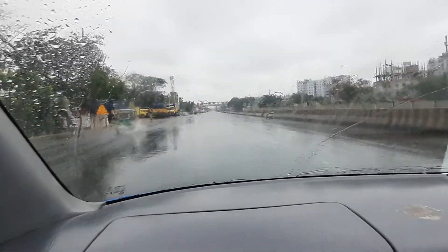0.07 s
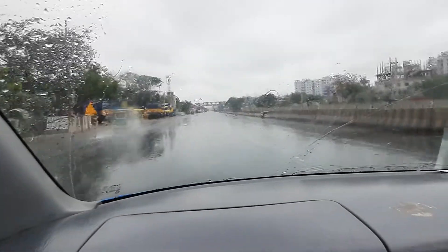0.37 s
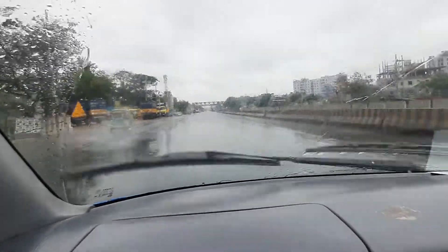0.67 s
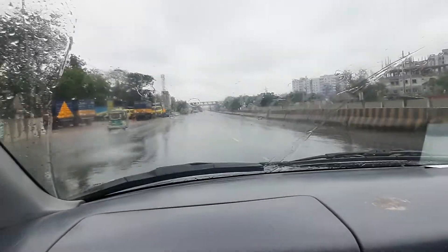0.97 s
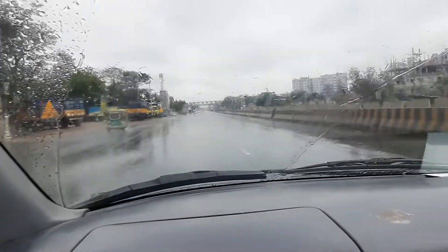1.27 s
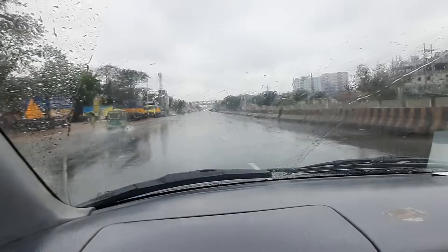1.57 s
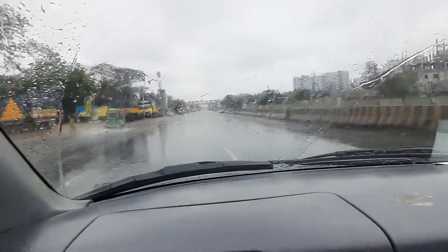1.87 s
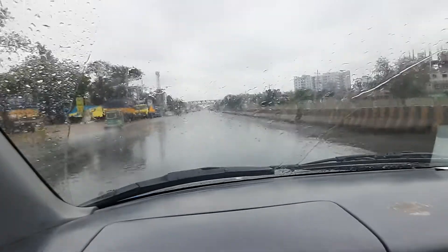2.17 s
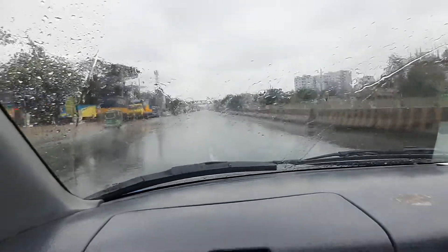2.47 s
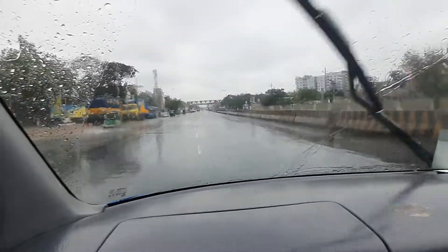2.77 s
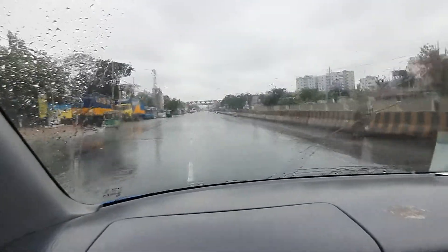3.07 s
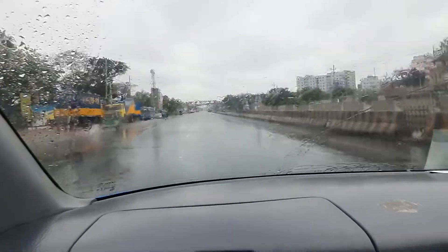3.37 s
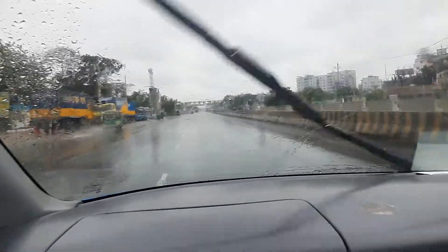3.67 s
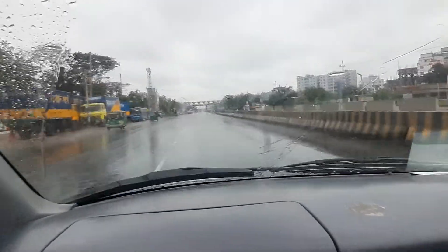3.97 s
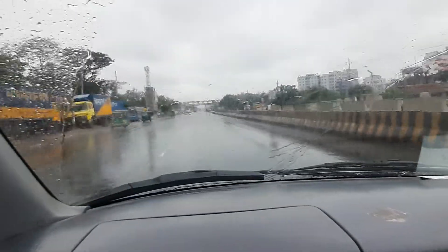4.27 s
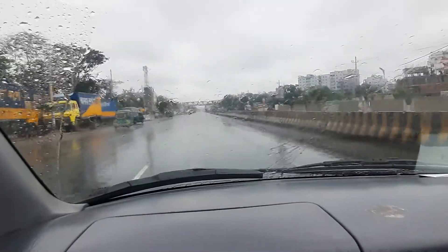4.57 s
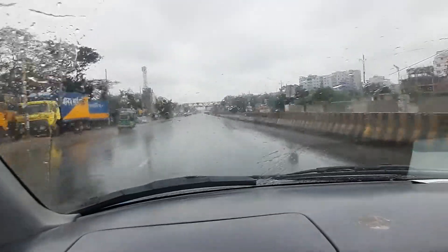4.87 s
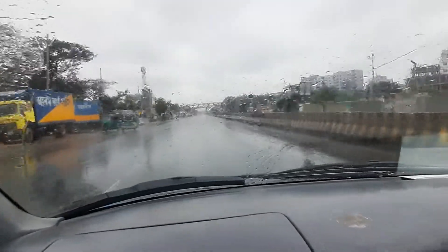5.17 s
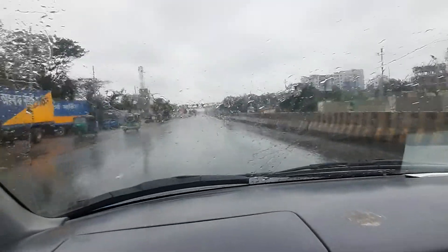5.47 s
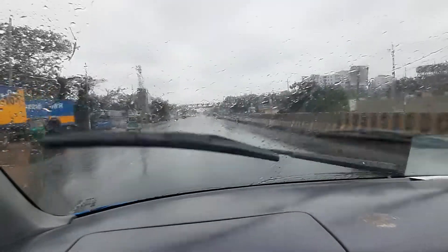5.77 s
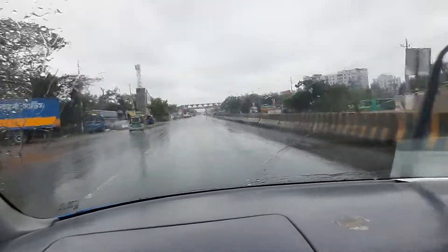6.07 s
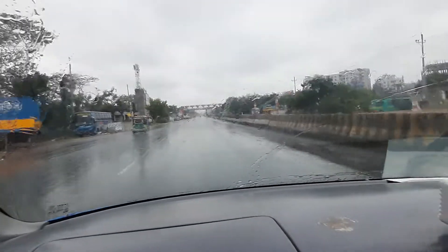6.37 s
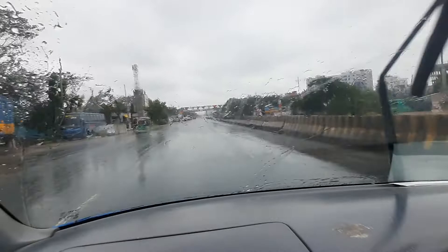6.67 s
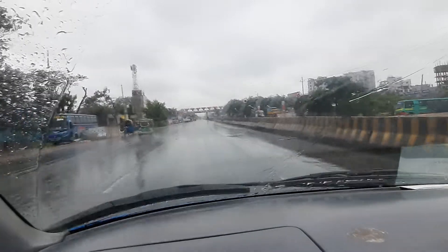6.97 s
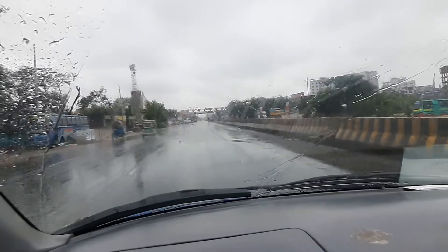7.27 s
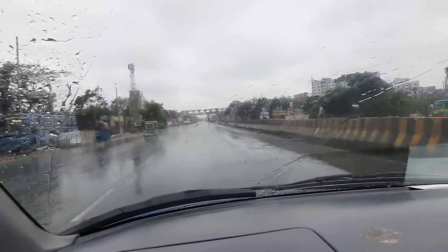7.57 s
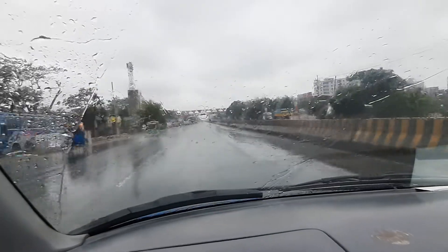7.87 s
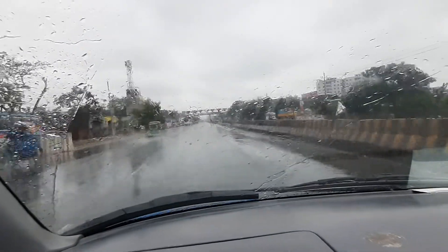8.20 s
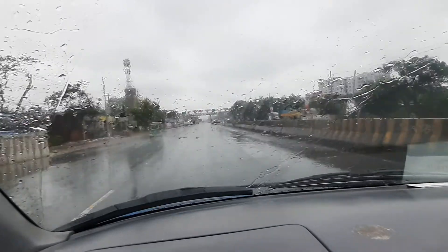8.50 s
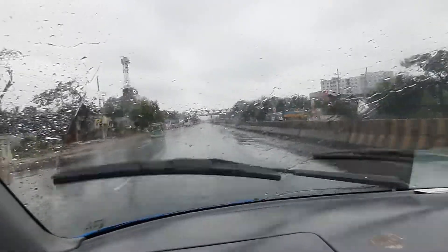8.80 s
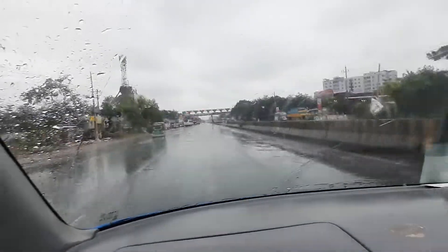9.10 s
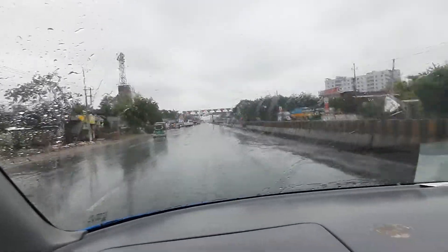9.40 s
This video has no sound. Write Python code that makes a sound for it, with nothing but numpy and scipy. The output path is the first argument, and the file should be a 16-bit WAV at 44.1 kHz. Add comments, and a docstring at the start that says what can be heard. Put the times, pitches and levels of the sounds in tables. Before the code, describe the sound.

A small car drives through rain, heard from inside the cabin. A deep, throbbing tyre boom and wet road roar run throughout, with an engine hum that falls in pitch as the car shifts up near the start. Drops tap sharply on the glass over short splashes and dull thuds. The wipers sweep quietly at intervals, a blade groaning briefly just past the middle and again near the end.

```python
"""Tyres boom on a rain-soaked highway, heard inside a small car that is gathering speed.
The boom beats against the engine's drone, which drops as the car shifts up after a second and a half.
The wet road roars, hisses and sloshes, and rough stretches of tarmac set the cabin drumming.
Drops and spray tick on the glass, and now and then a panel gives a dull knock.
The wipers rub and click about every three seconds, and twice a blade groans."""
import sys
import numpy as np
from scipy import signal
from scipy.fft import rfft, irfft, next_fast_len
from scipy.io import wavfile
from scipy.ndimage import uniform_filter1d

SR = 44100
rng = np.random.default_rng(int(sys.argv[2]) if len(sys.argv) > 2 else 0)


def unload_wav(signal):
    """Save mono or channel-first audio to the path in sys.argv[1] as 16-bit WAV at rate SR, clipped to [-1, 1]."""
    wavfile.write(
        sys.argv[1],
        SR,
        np.round(np.clip(np.atleast_2d(signal).T, -1, 1) * 32767).astype(np.int16),
    )


N = 420713
TIME = np.arange(N) / SR   # seconds
FFT_SIZE = 2 * next_fast_len(N // 2 + 1, True)
BIN_HZ = np.maximum(np.arange(FFT_SIZE // 2 + 1) * SR / FFT_SIZE, 1)
SHIFT_START_S = 1.35   # when the gear change begins
PING_HZ = 7250   # the pitch around which the drops ping


def from_db(db):
    """Turn decibels into a number to multiply a sound by."""
    return 10 ** (np.asarray(db) / 20)


def rms_one(x):
    """Scale a signal so that its average strength (rms) is 1."""
    return x / np.sqrt(np.mean(x ** 2) + 1e-20)


def in_time(points):
    """Join the points of a (time, value) table with straight lines, giving a value for every sample."""
    return np.interp(TIME, *np.transpose(points))


def over_hz(points, outside=None):
    """Join the points of a (frequency, value) table; past its ends, hold them or use `outside`."""
    hz, value = np.transpose(points)
    return np.interp(np.log(BIN_HZ), np.log(hz), value, outside, outside)


def ramp(start, length):
    """A smooth step from 0 to 1."""
    return .5 - .5 * np.cos(np.pi * np.clip((TIME - start) / length, 0, 1))


def drift(rate):
    """A random wobble of typical size 1 that turns about `rate` times a second."""
    steps = rng.standard_normal(N // 8)
    return rms_one(np.interp(TIME * np.pi * rate, np.arange(len(steps)), steps))


def pan(db):
    """Left and right gains that make the left side `db` decibels louder."""
    return from_db(np.array([[.5], [-.5]]) * db)


def tone(hz, waver_db, waver_rate, jitter_hz):
    """A tone that follows a pitch curve and wavers a little in strength and pitch."""
    cycles = np.cumsum(hz + jitter_hz * drift(waver_rate)) / SR
    return rms_one(np.sin(2 * np.pi * cycles) * from_db(waver_db * drift(waver_rate)))


def split(x, hz):
    """The parts of a sound below and above a frequency."""
    low = signal.sosfiltfilt(signal.butter(4, hz, fs=SR, output="sos"), x)
    return low, x - low


def strikes(times, db):
    """A spike of energy at each of the given moments."""
    return np.bincount(np.clip(times * SR, 0, N - 1).astype(int), from_db(db) ** 2, N)


def dying(energy, t60):
    """Let energy die away; t60 is the time in seconds it takes to fade by 60 dB."""
    return signal.lfilter([1], [1, -from_db(-60 / (t60 * SR)) ** 2], energy + 1e-18)


# how alike the two ears hear the cabin: (frequency [Hz], likeness [1 = same, 0 = unrelated])
EAR_LIKENESS = [(60, .998), (150, .998), (220, 0.83), (380, 0.39), (680, 0.82), (1000, 0.14), (1400, -0.19),
                (3000, 0), (15000, 0)]
# which side is louder: (frequency [Hz], left over right [dB])
EAR_BALANCE = [(60, 3.5), (120, 2), (170, 2), (270, 5.5), (380, 0), (700, 0.5), (950, 0.5), (1350, -3),
               (2000, -3.5), (2800, -0.5), (8800, 0.5), (13000, -2)]
def cabin_noise(spectrum):
    """Stereo noise of strength 1, coloured by a spectrum: the bass is alike at both ears, the treble not."""
    shared, opposite = rfft(rng.standard_normal((2, FFT_SIZE)))
    alike = over_hz(EAR_LIKENESS)
    ears = np.sqrt(1 + alike) * shared + np.sqrt(1 - alike) * opposite * [[1], [-1]]
    colour = from_db(over_hz(spectrum, outside=-np.inf)) * pan(over_hz(EAR_BALANCE))
    return rms_one(irfft(ears * colour, FFT_SIZE)[:, :N])


# how fast the wheels spin: (time [s], speed [turns per s])
WHEEL_SPEED = [(0, 7.57), (2.1, 7.55), (5, 7.98), (9.54, 8.53)]
# how loud the tyres boom: (time [s], level [dB])
TYRE_BOOM_LEVEL = [(0, -27), (.45, -19.5), (1.5, -22.5), (2.15, -19.5), (2.9, -23.5), (3.6, -18),
                   (4.7, -22.5), (5.3, -20.5), (5.9, -17), (7.1, -22), (8, -21.5), (8.5, -24), (9.54, -21)]
def tyre_boom(pushes_per_turn=7, throb_db=-2.5):
    """Uneven tyres shake the cabin's air near its lowest natural note, throbbing once per wheel turn."""
    speed = in_time(WHEEL_SPEED)
    throb = np.sin(2 * np.pi * np.cumsum(speed) / SR)
    boom = tone(speed * pushes_per_turn, waver_db=1.6, waver_rate=3, jitter_hz=.2)
    return from_db(in_time(TYRE_BOOM_LEVEL) + throb_db * throb) * boom * pan(1.5)


def engine_load():
    """How hard the engine pulls: 1 in low gear, falling to 0 through the gear change."""
    return 1 - ramp(SHIFT_START_S, length=.65)


# tones of the engine's whine: (pitch [times the firing rate], relative level [dB])
WHINE_TONES = [(2.4, 2), (3.6, 4.5), (4.75, -3), (6.5, -2), (8.25, .8), (10.05, -9), (16.5, -17)]
def engine(start_hz=82.8, climb_hz_per_s=.62, shift_drop_hz=22):
    """The firing cylinders drone and the alternator hums; a whine sinks and fades at the gear change."""
    load = engine_load()
    firing_hz = start_hz + climb_hz_per_s * TIME - shift_drop_hz * (1 - load)
    drone_db = -33 * load - 27 * (1 - load)   # louder in high gear, near the cabin's lowest natural note
    drone = from_db(drone_db) * tone(firing_hz, waver_db=1.2, waver_rate=3, jitter_hz=.1)
    octave = from_db(-35) * tone(2 * firing_hz, waver_db=3.5, waver_rate=3, jitter_hz=.13)
    hum_db = -41.5 - 4 * load   # softer in low gear, where it lies above the cabin's resonance
    alternator = from_db(hum_db) * tone(4.125 * firing_hz, waver_db=2.5, waver_rate=6.8, jitter_hz=.87)
    whine = sum(from_db(db) * tone(multiple * firing_hz, waver_db=2.2, waver_rate=26, jitter_hz=3.8)
                for multiple, db in WHINE_TONES)
    return (drone + octave + alternator + from_db(-41) * load ** 2 * whine) * pan(1.8)


# how loud the gearbox hums: (time [s], level [dB])
GEARBOX_LEVEL = [(0, -36), (2.2, -29), (3.6, -51), (4.4, -27.5), (5.4, -29), (6.2, -28), (6.75, -33),
                 (7.2, -24.5), (8.7, -27.5), (9.54, -36)]
def gearbox_hum(shaft_turns_per_wheel_turn=6.74, throb_hz=4, throb_depth=.6, crest_s=7.225):
    """A spinning shaft hums at two and three times its turning rate; the upper tone throbs evenly."""
    shaft_hz = in_time(WHEEL_SPEED) * shaft_turns_per_wheel_turn
    upper = tone(3 * shaft_hz, waver_db=1.2, waver_rate=7, jitter_hz=.5)
    lower = from_db(-8) * tone(2 * shaft_hz, waver_db=2.5, waver_rate=5, jitter_hz=.8)
    throb = rms_one(1 + throb_depth * np.cos(2 * np.pi * throb_hz * (TIME - crest_s)))
    return from_db(in_time(GEARBOX_LEVEL)) * (throb * upper + lower) * pan(2.8)


# the deep boom of the car's body: (frequency [Hz], relative level [dB])
BODY_SPECTRUM = [(15, -22), (30, -18), (40, -19), (48, -3), (54, 0), (68, -3), (80, -9), (110, -22),
                 (200, -50)]
# the rumble of the road: (frequency [Hz], relative level [dB])
RUMBLE_SPECTRUM = [(20, -43), (37, -13), (47, 0), (70, -12.5), (90, -0.5), (113, 2.5), (142, -10),
                   (170, -8), (205, -8.5), (240, -15), (400, -64)]
def road_rumble(rough_boost_db=3):
    """Tarmac shakes the car's body, and shakes it harder on the rough stretches."""
    rough_db = rough_boost_db * sum(on_stretch(start, length) for start, length, _ in ROUGH_TARMAC)
    boom = from_db(-26.5 + rough_db) * cabin_noise(BODY_SPECTRUM)
    rumble = from_db(-24.5 + rough_db + .44 * drift(5.6)) * cabin_noise(RUMBLE_SPECTRUM)
    return boom + rumble


# how water on the road raises and lowers the tyres' noise: (time [s], level change [dB])
ROAD_WETNESS = [(0, -0.5), (1.2, -0.5), (1.75, -0.5), (2.25, -0.9), (3.45, 0.65), (4.05, -0.94), (4.85, -2),
                (5.6, -0.37), (7.45, -0.13), (8.95, 1.5), (9.54, 1)]
# the roar of the tread: (frequency [Hz], relative level [dB])
ROAR_SPECTRUM = [(90, -8.5), (150, 0), (200, 0), (235, -4.5), (275, 1), (350, -5.5), (460, -10), (560, -10),
                 (750, -12), (900, -15.5), (1200, -32), (2500, -80)]
# the rush of thrown water: (frequency [Hz], relative level [dB])
SPRAY_SPECTRUM = [(600, -51), (980, 3.5), (1150, 0), (1380, 3), (1600, -1), (2100, -0.5), (2700, -6),
                  (3300, -11.5), (6000, -52)]
# the water's high hiss: (frequency [Hz], relative level [dB])
HISS_SPECTRUM = [(2000, -1), (3200, 2.5), (3900, 2.5), (4900, 2), (5800, -2), (6600, 0.7), (7400, -0.5),
                 (8000, -5), (8800, -11.5), (10000, -11), (12300, -10), (14000, -13), (16000, -14)]
def wet_road():
    """The tread roars and thrown water hisses, more where it is wetter; roar and spray ease in high gear."""
    wet_db = in_time(ROAD_WETNESS)
    roar_db = -27.5 + 1.3 * wet_db + 2.5 * engine_load()
    spray_db = -39 + wet_db + 3 * (1 - ramp(SHIFT_START_S, length=1.5))
    roar = from_db(roar_db + .44 * drift(8)) * cabin_noise(ROAR_SPECTRUM)
    spray = from_db(spray_db + .72 * drift(12)) * cabin_noise(SPRAY_SPECTRUM)
    hiss = from_db(-43 + wet_db + 1.08 * drift(10)) * cabin_noise(HISS_SPECTRUM)
    return roar + spray + hiss


# the sizzle of fine spray: (frequency [Hz], relative level [dB])
SIZZLE_SPECTRUM = [(9000, -12), (11000, -3), (12300, 0), (13500, -4), (16000, -12)]
# how loud it sizzles: (time [s], level [dB])
SIZZLE_SWELLS = [(0, -64), (2.8, -63), (3.45, -57), (4.2, -65), (5.8, -62), (6.7, -65), (7.6, -61),
                 (8.8, -57), (9.1, -62), (9.54, -58)]
def sizzle(grain_db=2):
    """The finest spray sizzles on the glass, swelling and sinking at its own pace."""
    grainy = rms_one(cabin_noise(SIZZLE_SPECTRUM) * from_db(grain_db * drift(300)))
    return from_db(in_time(SIZZLE_SWELLS)) * grainy


# rubber sliding on wet glass: (frequency [Hz], relative level [dB])
RUB_SPECTRUM = [(250, -26), (400, 4), (560, 0), (800, -11), (1300, -26)]
def wiper_rub(sweep_at_s=2.5, every_s=3.1, stroke_s=.72):
    """The blades sweep out and back, rubbing loudest in mid-stroke, where they move fastest."""
    strokes = (TIME - sweep_at_s) % every_s / stroke_s
    speed = np.abs(np.sin(np.pi * strokes)) * (strokes < 2)   # two strokes, then a rest
    return speed * from_db(-48 + drift(11)) * cabin_noise(RUB_SPECTRUM)


def small_drops(count=300, spread_db=2.5, pitch_range_hz=600):
    """Rows like BIG_DROPS for small drops that land at random, harder where the road is wetter."""
    when, size, pitch, tap, ping, spatter = rng.random((count, 6)).T
    times = when * N / SR
    db = np.interp(times, *np.transpose(ROAD_WETNESS)) - spread_db * np.log(np.maximum(size, .1))
    tap_db = db - 51.5 + 6 * (tap - .5)
    ping_db = db - 58 + 6 * (ping - .5)
    spatter_db = db - 60 + 5 * (spatter - .5)
    return np.transpose([times, tap_db, ping_db, spatter_db, PING_HZ + pitch_range_hz * (pitch - .5)])


def pings(times, levels_db, pitches_hz, count=9, width_hz=600, attack_s=.003, t60=.095):
    """Each hit gives a short, high ping: a bunch of close tones around a pitch of its own."""
    age = TIME[:SR // 8]
    out = np.zeros((2, N + len(age)))
    for start, gain, centre_hz in zip((times * SR).astype(int), from_db(levels_db), pitches_hz):
        stretch = (centre_hz / PING_HZ) ** 3.3   # lower pings die sooner
        envelope = from_db(-60 * age / (t60 * stretch)) * (1 - np.exp(-age / (attack_s * stretch)))
        tones_hz = centre_hz + width_hz * (rng.random((count, 1)) - .5)
        phases = rng.random((2, count, 1))
        ring = np.sin(2 * np.pi * (tones_hz * age + phases)).sum(axis=1) * np.sqrt(2 / count)
        out[:, start:start + len(age)] += gain * envelope * ring
    return out[:, :N]


def noise_bursts(times, db, side_db, spectrum, t60, click_db, grain_db):
    """Each hit is a sharp click, a short burst of grainy noise and a faint echo in the cabin."""
    energy = np.array([strikes(times, db + side * side_db) for side in (.5, -.5)])
    click = from_db(click_db) ** 2 * dying(energy, t60=.0046)
    echo = from_db(-14) ** 2 * dying(energy, t60=.13)
    onset = dying(energy, t60=.007)   # taken away so that the burst needs a moment to build
    burst = np.maximum(dying(energy, t60) + echo - onset, 0)
    grainy = rms_one(cabin_noise(spectrum) * from_db(grain_db * drift(900)))
    return np.sqrt(click + burst) * grainy


# a bright tap: (frequency [Hz], relative level [dB])
TAP_SPECTRUM = [(1800, -5), (3200, 1.5), (4800, -1), (6400, -2.5), (7400, -9), (8600, -9)]
# a fine, high spatter: (frequency [Hz], relative level [dB])
SPATTER_SPECTRUM = [(7500, -8), (8700, -1), (12500, 1), (15500, -3)]
# big drops and splashes on the glass, before the boost:
# (time [s], tap level [dB], ping level [dB], spatter level [dB], ping pitch [Hz])
BIG_DROPS = [(0.027, -36, -44, -42, 7580), (0.501, -41, -54, -50, 7200), (0.614, -36.5, -54, -46, 7200),
             (0.641, -44, -56, -53, 7200), (0.692, -52, -45, -58, 7360), (0.757, -39, -40, -52, 7250),
             (0.881, -50, -46, -56, 7210), (0.942, -40, -47, -52, 7200), (1.23, -40, -47, -50, 7220),
             (1.255, -44, -49, -51, 7320), (1.282, -42, -48, -54, 7200), (1.309, -49, -41, -54, 7150),
             (1.515, -40, -52, -53, 7100), (1.574, -39, -47, -45, 7300), (1.598, -44, -47, -48, 7360),
             (1.632, -43, -49, -49, 7300), (1.697, -46, -50, -51, 7600), (1.731, -35.5, -45, -45, 7110),
             (2.038, -43, -51, -47, 6930), (2.435, -42, -56, -51, 7190), (2.758, -42, -48, -52, 6620),
             (2.918, -47, -47, -51, 6840), (3.167, -41, -45, -48, 7250), (3.222, -36.5, -41, -47, 6800),
             (3.356, -38, -47, -47, 7200), (3.44, -39, -42, -42, 7060), (3.496, -48, -42.5, -50, 7300),
             (3.568, -37, -40.5, -45, 7430), (3.582, -47, -49, -46, 7430), (3.635, -54, -48, -50, 7400),
             (3.672, -54, -55, -48, 7300), (3.889, -38, -52, -44, 7200), (4.161, -44, -52, -50, 7200),
             (4.356, -48, -48, -56, 7190), (4.41, -45, -47, -54, 7300), (4.573, -42, -54, -54, 7200),
             (4.927, -50, -44, -54, 7360), (5.05, -41, -45, -52, 7170), (5.136, -48, -47, -54, 7190),
             (6.042, -38, -37, -47, 7300), (6.132, -48, -47, -49, 7350), (6.279, -38, -51, -53, 7100),
             (6.302, -43, -53, -53, 7000), (6.347, -39, -42, -49, 7050), (6.404, -38, -46, -50, 5500),
             (6.604, -36.5, -43.5, -56, 6500), (6.797, -39, -48, -54, 7200), (6.974, -41, -47, -50, 7200),
             (7.794, -52, -43, -56, 6890), (7.82, -48, -45, -54, 7300), (8.508, -44, -49, -47, 7150),
             (8.93, -41, -45, -48, 7300), (9.105, -43, -36, -48, 4800), (9.245, -47, -46, -49, 7420),
             (9.316, -42, -38.5, -48, 7370)]
def drops_and_clicks(boost_db=3.5, side_spread_db=1.5):
    """Drops hit the glass with a tap, a ping and a spatter; the wipers' clicks mix the same three sounds."""
    times, tap_db, ping_db, spatter_db, ping_hz = np.vstack([BIG_DROPS, wiper_clicks(), small_drops()]).T
    side_db = side_spread_db * rng.standard_normal(len(times))
    ringing = pings(times, ping_db, ping_hz)
    taps = noise_bursts(times, tap_db, side_db, TAP_SPECTRUM, t60=.04, click_db=2, grain_db=-1.5)
    spatter = noise_bursts(times, spatter_db, side_db, SPATTER_SPECTRUM,
                           t60=.036, click_db=1.5, grain_db=4.5)
    return from_db(boost_db) * (ringing + taps + spatter)


# sloshing water: (frequency [Hz], relative level [dB])
SLOSH_SPECTRUM = [(220, -16), (330, 2.5), (550, 1.5), (850, -6.5), (1200, -9.5), (2500, -21)]
# shallow puddles under the tyres: (time [s], draining time [s], level [dB])
PUDDLE_HITS = [(0.72, 0.32, -30), (1.15, 0.35, -32.5), (4.86, 0.12, -34), (5.39, 0.2, -31.5),
               (8.81, 0.37, -35)]
def puddles(attack_s=.018):
    """Water thrown into the wheel arches swells quickly and drains away."""
    swell = sum(from_db(db) * (ramp(start, attack_s) - ramp(start + attack_s, drain_s))
                for start, drain_s, db in PUDDLE_HITS)
    return swell * cabin_noise(SLOSH_SPECTRUM)


# a knocked panel: (frequency [Hz], relative level [dB])
KNOCK_SPECTRUM = [(40, -10), (150, -27), (300, 16), (480, 11), (900, 9), (1500, -7), (2300, 0.5),
                  (5000, -19), (10000, -38)]
# dull knocks of the body and wipers: (time [s], base level [dB], extra bass [dB], extra treble [dB])
KNOCK_HITS = [(0.769, -26, 6, -2), (1.565, -27, 6, -6), (3.56, -29, 0, -2), (6.277, -26.5, 2, -5),
              (7.043, -20.7, -2, -4), (8.842, -25, 3, 3.5), (9.146, -20.7, 5, 1)]
def knocks(contact_s=.01):
    """Padded panels answer a soft blow with a long thud, a clack and a short rattle of the trim."""
    times, db, bass_db, treble_db = np.transpose(KNOCK_HITS)
    thud, upper = split(cabin_noise(KNOCK_SPECTRUM), hz=240)
    clack, rattle = split(upper, hz=1300)
    out = 0
    for part, part_db, t60 in ((thud, bass_db - 9, .46), (clack, -3, .15), (rattle, treble_db - 3, .15)):
        envelope = np.sqrt(dying(strikes(times, db + part_db), t60))
        out = out + part * uniform_filter1d(envelope, int(contact_s * SR))   # smoothing softens the blow
    return out


def on_stretch(start, length, edge_s=.26):
    """1 while the tyres are on a rough stretch and 0 elsewhere, with soft edges."""
    return ramp(start - edge_s / 2, edge_s) - ramp(start + length - edge_s / 2, edge_s)


# the cabin's drumming note: (frequency [Hz], relative level [dB])
DRUM_SPECTRUM = [(95, -8), (108, 4), (115, 2), (122, -8.5), (138, -9)]
# rough stretches of tarmac: (start [s], length [s], drumming level [dB])
ROUGH_TARMAC = [(1.424, 0.34, -17.5), (3.213, 0.89, -19.5), (8.702, 0.94, -22)]
def drumming():
    """Rough tarmac sets the cabin's air drumming on one low note, at a fairly even level."""
    note = cabin_noise(DRUM_SPECTRUM)
    power = uniform_filter1d(np.mean(note ** 2, axis=0), SR // 12)
    evened = rms_one(note / np.sqrt(power + .15))
    return sum(from_db(db) * on_stretch(start, length) for start, length, db in ROUGH_TARMAC) * evened


# the wipers' clicks: (time [s], relative level [dB])
WIPER_TICKS = [(2.637, -3), (5.738, 0), (8.84, 9.5)]
def wiper_clicks(tap_db=-44, ping_db=-53, spatter_db=-45.5):
    """Rows like BIG_DROPS for the wipers, which give a sharp, bright click early in each sweep."""
    return [(time, db + tap_db, db + ping_db, db + spatter_db, PING_HZ) for time, db in WIPER_TICKS]


# groans of a wiper blade: (start [s], level [dB])
BLADE_GROANS = [(5.879, -42.5), (8.82, -39)]
def wiper_groan(length_s=.3, low_hz=390, high_hz=660):
    """A blade judders on the wet glass: a rough tone that swells and rises on the outward stroke."""
    out = 0
    for start, db in BLADE_GROANS:
        progress = np.clip((TIME - start) / length_s, 0, 1)
        swell = np.sqrt(4 * progress * (1 - progress))
        hz = low_hz + (high_hz - low_hz) * progress
        out = out + from_db(db) * swell * tone(hz, waver_db=3, waver_rate=20, jitter_hz=25)
    return out * pan(.5)


def scene():
    """Everything as heard from the front seat."""
    driving = engine() + tyre_boom() + gearbox_hum() + road_rumble() + wet_road() + drumming()
    return driving + drops_and_clicks() + knocks() + puddles() + wiper_rub() + sizzle() + wiper_groan()


def record(dry, cutoff_hz=15700):
    """Cut away the very highest treble with a steep filter."""
    return signal.sosfiltfilt(signal.ellip(10, .05, 60, cutoff_hz, fs=SR, output="sos"), dry)


dry = scene()
out = record(dry)
unload_wav(out)
```